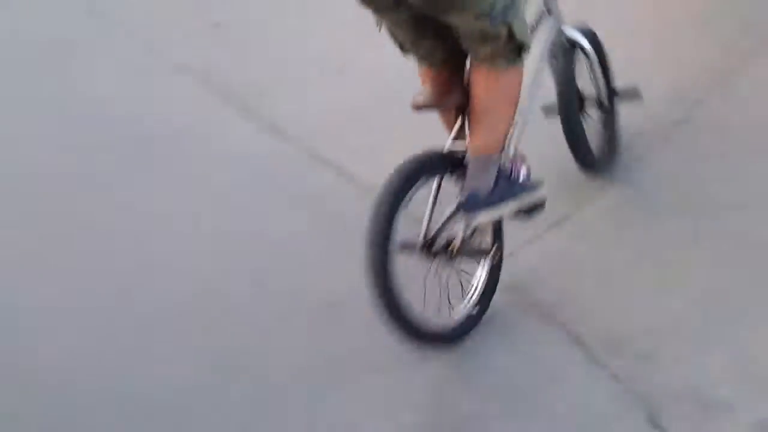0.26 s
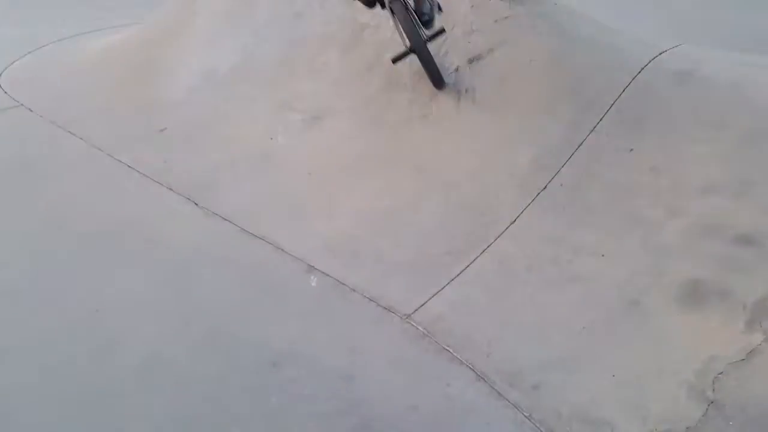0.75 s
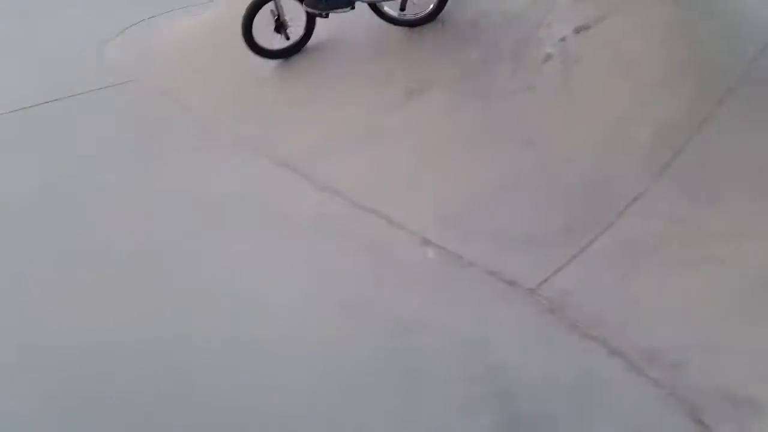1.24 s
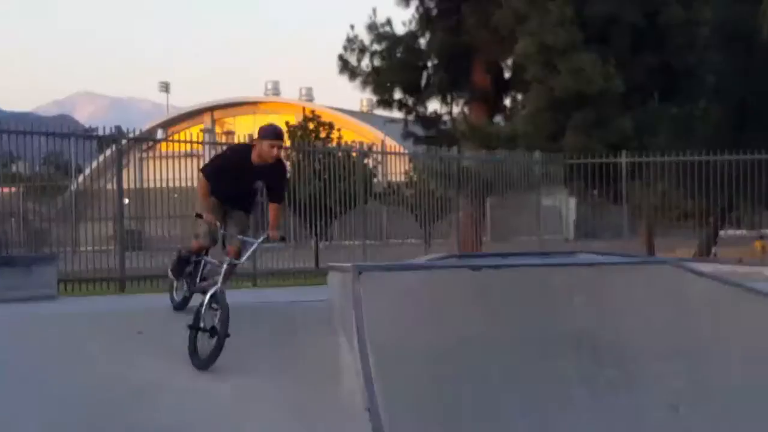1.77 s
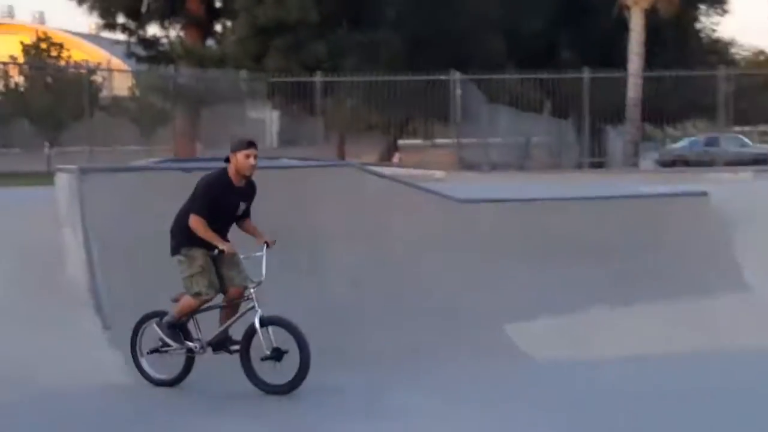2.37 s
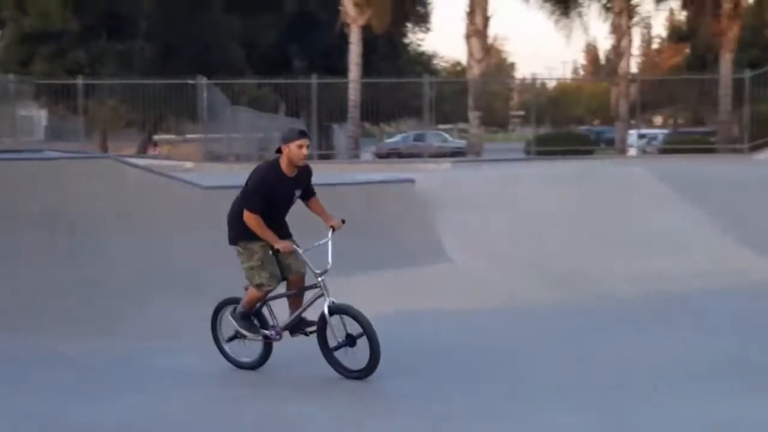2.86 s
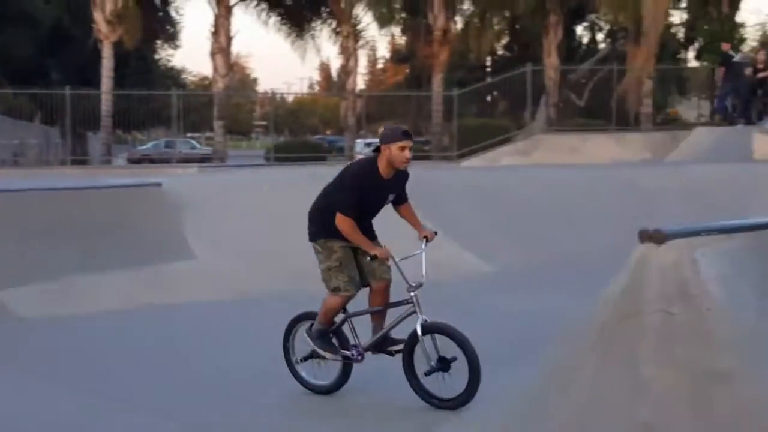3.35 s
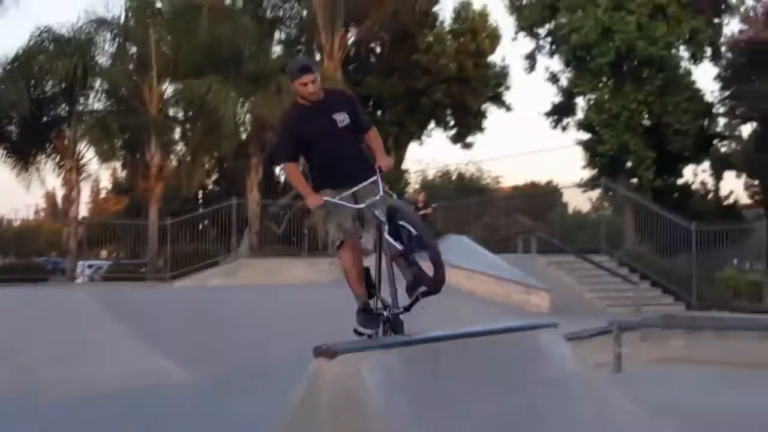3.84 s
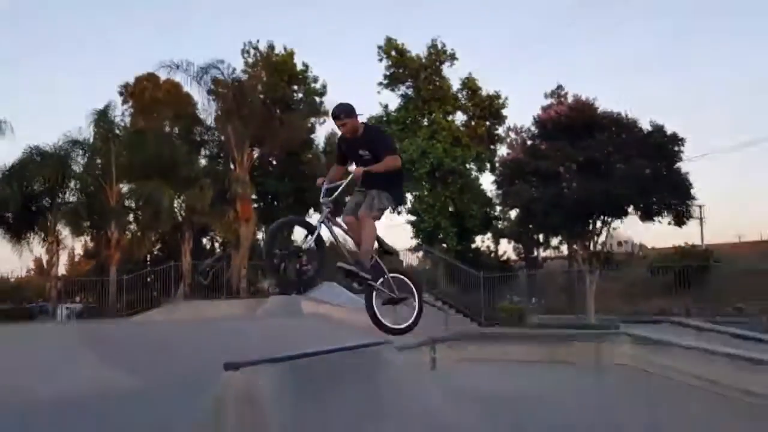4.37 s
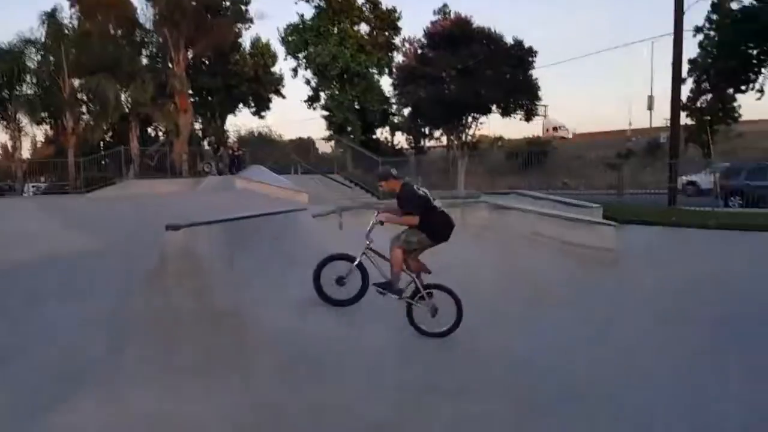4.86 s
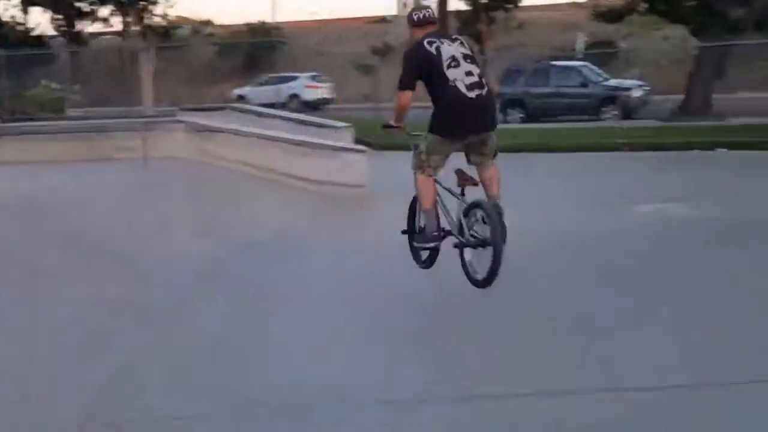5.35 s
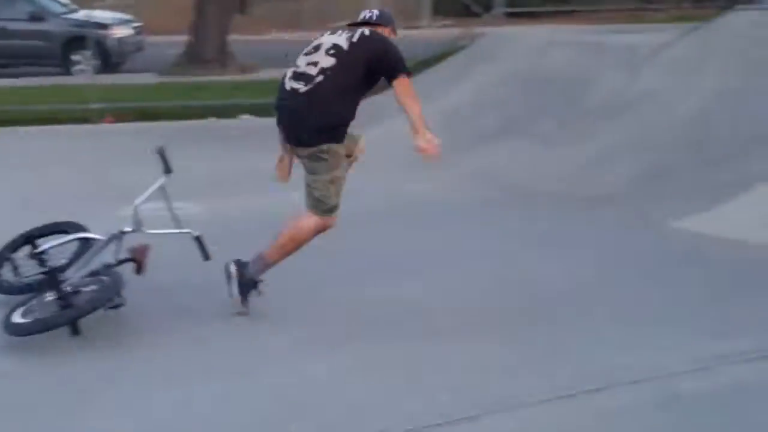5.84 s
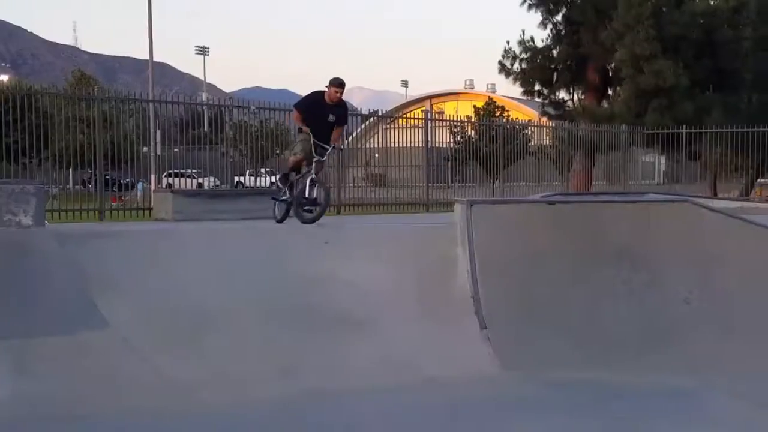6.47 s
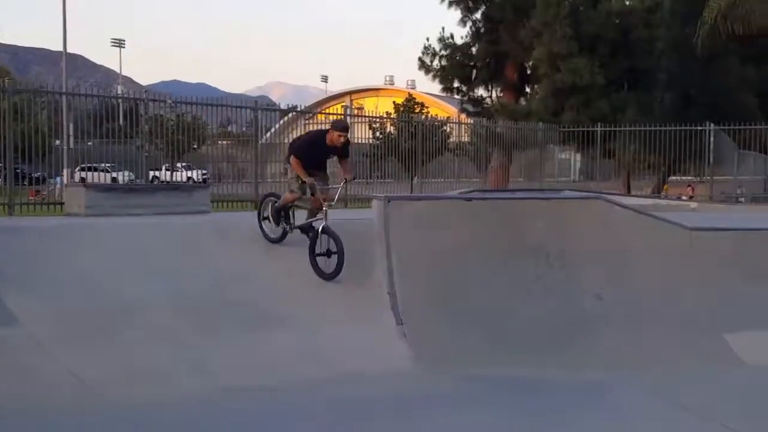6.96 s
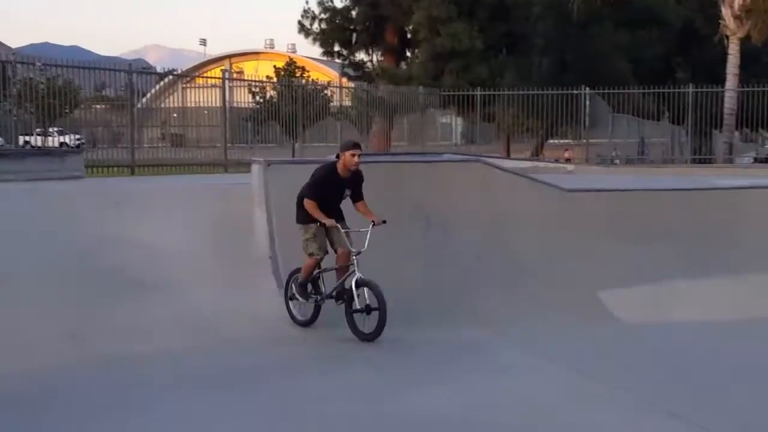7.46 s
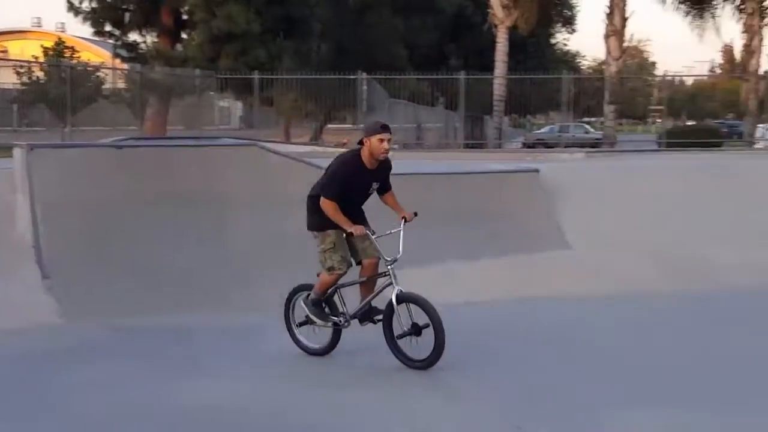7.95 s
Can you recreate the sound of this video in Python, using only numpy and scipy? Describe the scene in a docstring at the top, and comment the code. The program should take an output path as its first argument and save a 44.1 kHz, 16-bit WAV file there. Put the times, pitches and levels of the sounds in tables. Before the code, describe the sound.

A bicycle hisses and ticks over concrete beside a rumbling road, lands with a rattle, then its steel frame crashes and clatters; two brief silences.

```python
"""Near bicycle on concrete: it is dropped and its steel frame clatters (struck modes, cracks, scrapes).
Before that it hisses past (gritty noise), freewheel ticking (noise puffs), and lands with a rattle (clicks).
Knocks echo off concrete banks. Behind it a far road roars, rumbles (shaped noise) and drones (resonances).
Three passages parted by silence, the second and third fading in; the last holds only the road."""
import sys
import numpy as np
from scipy import signal
from scipy.fft import rfft, irfft, next_fast_len
from scipy.io import wavfile
from scipy.ndimage import uniform_filter1d

SR = 44100
rng = np.random.default_rng(int(sys.argv[2]) if len(sys.argv) > 2 else 0)


def transcribe(signal):
    """Save signal, clipped to [-1, 1], as a 16-bit WAV file at the path in sys.argv[1]."""
    frames = np.atleast_2d(signal).T
    limited = np.clip(frames, -1, 1)
    pcm = np.round(limited * 32767).astype(np.int16)
    wavfile.write(sys.argv[1], SR, pcm)


N = 362061

# passages between silences: fade_start_s, fade_length_s, cut_s
PASSAGES = [(-1, .2, 1.842), (2.153, .21, 6.407), (6.716, .21, 8.21)]
# far road, its brightness drifting, mostly brighter where the roar is weak:
# time_s, roar_db, rumble_db, tilt_db_per_octave (of the roar, 800-2400 Hz, then held)
ROAD_LEVELS = [(0, -27.5, -32.5, 1.5), (1.799, -26.5, -32.5, 1), (2.2, -33, -34, 2),
               (3.35, -27.5, -31, 0.76), (4.2, -28, -30.5, 0.5), (5.1, -27.5, -30.5, 1),
               (6.3, -28.5, -29, -0.6), (6.801, -33, -36.5, 2.5), (7.2, -29.5, -34.5, 2.5),
               (8.199, -30.5, -35.5, 2.2)]
# far tyre roar, relative spectrum: freq_hz, level_db_per_hz
ROAR_SPECTRUM = [(180, -38.5), (300, -17.5), (548, -6), (844, 3.5), (1110, -0.5), (1540, -3.5), (2340, -8),
                 (3330, -23.5), (4070, -26.5), (5990, -41), (8540, -47.5), (10100, -72), (12000, -68),
                 (15600, -80), (22000, -120)]
# low road rumble, relative spectrum: freq_hz, level_db_per_hz
RUMBLE_SPECTRUM = [(15, -56), (25, -25.5), (43, -9), (114, 3.5), (162, -3.5), (227, -3), (365, -13),
                   (500, -16.5), (650, -46.5), (1100, -120)]
# engine drones: start_s, end_s, pitch_hz, width_hz (each of two passes), level_db
ENGINE_DRONES = [(0, 1.4, 137, 9, -36), (1.3, 2.103, 128.4, 10, -32.5), (4.2, 5.326, 213.6, 45, -32),
                 (5.402, 6.101, 98.2, 16, -34), (6.602, 8.3, 69.6, 5.6, -35.5),
                 (6.699, 8.411, 121.2, 31, -35)]
# bearing of the noise beds: time_s, left_lag_ms, left_minus_right_db
NOISE_BEARING = [(0, -0.27, -0.9), (1.8, -0.24, -1), (2.2, 0.19, -0.8), (3.3, 0.36, 0), (5.3, 0.23, 0.5),
                 (6.3, -0.14, 0), (6.75, 0.061, -1.5), (8.2, 0.28, 0)]
# likeness of left and right noise: freq_hz, likeness_0_to_1
LIKENESS = [(60, 1), (300, 0.93), (800, 0.66), (1200, 0.47), (1600, 0.55), (3000, 0.099), (6000, 0.081)]
# level difference between microphones: freq_hz, left_minus_right_db
MIC_SHADING = [(60, -1.5), (240, -1.5), (480, -1.5), (1890, -1.5), (3770, -10.5), (7520, 3), (15000, 15.5)]
# tyre passes (climb, roll down, landing, skid): start_s, length_s, first_db, last_db
TYRE_PASSES = [(0, 1.6, -44.5, -56), (1.293, 0.52, -48, -43), (4.844, 0.21, -36.5, -59),
               (5.644, 0.24, -47, -71)]
# fallen bicycle skittering: start_s, length_s, first_db, last_db
SLIDE_SPAN = (6, 0.48, -32.5, -36)
# rubber on concrete, relative spectrum: freq_hz, level_db_per_hz
HISS_SPECTRUM = [(1470, -30), (2500, -7), (3830, -20.5), (6190, -23), (6730, -28), (9280, -24.5),
                 (10800, -39), (12000, -31.5), (15000, -50.5)]
# even ticking, rolling down: start_s, end_s, ticks_per_s
COAST_TICKS = (1.2875, 1.84, 42.6)
# pawl tick, relative spectrum: freq_hz, level_db_per_hz
PAWL_SPECTRUM = [(1760, -25), (3000, -1), (4740, -12), (6080, -5), (6730, -14.5), (9170, -11.5),
                 (10800, -25.5), (12000, -16), (14200, -28), (15000, -64)]
# chain, pedal and peg clicks; at 5.262 s a very faint broad puff of noise:
# start_s, start_level_db, centre_hz, width_hz (each of two passes), t60_s
CLICKS_AND_PUFF = [(.296, -47.5, 9000, 9000, 0.043), (1.164, -30.5, 3900, 1200, 0.019),
                   (1.165, -45, 9000, 9000, .015), (2.69, -57, 6000, 9000, 0.012),
                   (2.784, -55, 6000, 8900, 0.013), (3.471, -47, 4950, 9000, .01),
                   (4.068, -41, 5000, 9000, 0.009), (4.8434, -25.5, 4000, 5000, 0.011),
                   (4.869, -37, 4160, 1200, .04), (4.87, -38.5, 8500, 1200, 0.056),
                   (4.914, -45, 8360, 1200, 0.033), (5.262, -61, 9000, 9000, 0.18),
                   (5.53, -41, 6000, 9050, 0.084), (5.640, -51, 6000, 9000, .03),
                   (5.645, -26, 5600, 1300, 0.03), (5.698, -48, 6500, 1000, 0.35),
                   (5.778, -35, 4200, 4000, 0.03), (5.785, -50, 11440, 4000, 0.16)]
# frame on concrete: start_s, blow_db, rise_s, share_of_free_t60, scrape_db, favoured_pitch_hz
FRAME_BLOWS = [(5.8091, -3, 0.00018, .06, -13, 850), (5.8117, -10, .0004, .06, -19, 720),
               (5.9012, -20, .002, .4, -12.5, 1290), (5.906, -8, 0.0032, 0.5, -16, 780),
               (5.922, -11.5, 0.0018, .6, -19.5, 760), (5.9675, -8, 0.0016, 0.4, -19, 710),
               (5.995, -6.5, 0.005, 0.45, -16, 680), (6.024, -17, .002, .5, -30.5, 710),
               (6.066, -7.5, 0.0012, .8, -24.5, 650), (6.080, -7.5, 0.0014, 0.6, -23.5, 710),
               (6.116, -9, 0.003, 0.6, -24, 620), (6.126, -11, 0.0021, 0.88, -20.5, 620),
               (6.140, -8.5, .002, 0.29, -25.5, 320), (6.362, -14, .002, 0.25, -18, 1000),
               (6.3675, -9.5, 0.004, 0.42, -16, 637), (6.379, -16.5, .0015, .5, -23, 677)]
# modes of steel frame and tyres ringing free: freq_hz, relative_level_db, t60_s
FRAME_MODES = [(151, 6.5, 0.083), (316, -1, 0.26), (623, 4, 0.14), (657.4, 8.5, 0.1), (703, 6.5, 0.11),
               (797, -1, 0.13), (881, 2.5, .08), (1295, 3.5, 0.1), (1920, -10.5, 0.1), (2464, -1.5, 0.095),
               (3263, -11, 0.074), (3970, -15, 0.055), (4920, -8.5, 0.03), (5600, -15.5, .05)]
# steel scraping concrete, relative spectrum: freq_hz, level_db_per_hz
SCRAPE_SPECTRUM = [(450, -40), (700, -13), (1600, -16.5), (2400, -19), (3500, -23), (5700, -29.5),
                   (8500, -25.5), (10300, -33.5), (12000, -29), (14500, -51.5), (15500, -56.5)]

TOUCH_S, LIFT_S = .005, .077  # hiss fade in, fade out
# slowing freewheel: first tick, rate then, time to lose 63% of the speed
CLIMB_START_S, CLIMB_TICKS_PER_S, SLOWING_S, CLIMB_TICKS = .4764, 43.8, .445, 15
CLIMB_DB, SOFT_START_DB, SWELL_S = -39.5, -7.5, .08  # first ticks softer
COAST_DB = -46
CATCHES_PER_S, CATCH_SPREAD_DB, CATCH_T60_S = 450, 2.0, .025
SLIDE_DULL_HZ = 2200  # treble above this fades as the slide slows
FREE_SCRAPE_T60_S = .13  # shortened by the ground, as the ring is
SPOT_DB_PER_OCTAVE, SPOT_FLOOR_DB = -55.5, -10.5  # loss away from the favoured pitch
CRACK_DB, CRACK_S = -1.5, .00018  # push of first contact; a slower rise weakens it
RATTLE_DB = 2.5  # loose parts make the scrape stutter
RASP_RELATIVE_WIDTH, BETWEEN_MODES_DB = .03, -8
DETUNE_RATIO = .02  # ground contact shifts modes above 1 kHz
ECHO_DB, ECHO_T60_S, ECHO_DULL_HZ = -5, .42, 3500
BASS_CUT_HZ, EDGE_HZ = 45, 15300


def gain_of(db):
    """Decibels to amplitude."""
    return 10 ** (np.asarray(db) / 20)


def evened(x):
    """Scales to rms 1."""
    return x / np.sqrt(np.mean(x ** 2) + 1e-20)


def read(points, hz):
    """Interpolates a spectrum table on a log-frequency axis."""
    f, value = np.transpose(points)
    return np.interp(np.log(hz + 1), np.log(f + 1), value)


def add(mix, start_s, sound):
    """Mixes a sound in at a time, trimmed to fit."""
    part = mix[..., round(start_s * SR):][..., :sound.shape[-1]]
    part += sound[..., :part.shape[-1]]


def band(x, hz, width_hz):
    """One-pole resonance of gain 1: shift to 0 Hz, smooth, shift back."""
    turn = np.exp(2j * np.pi * hz * np.arange(x.shape[-1]) / SR)
    r = np.exp(-np.pi * max(width_hz, 1) / SR)
    return 2 * (turn * signal.lfilter([1 - r], [1, -r], x / turn)).real


def wash(spectrum, patchy_db, size, tilt=((0, 0),)):
    """Two-microphone noise from one bearing: partly alike, one side delayed, with drifting patches."""
    hop = size // 4
    frames, hz = N // hop + 5, np.fft.rfftfreq(size, 1 / SR)[:, None]
    t = np.arange(frames) * hop / SR
    a, b, c, d, patches = rng.standard_normal((frames, len(hz), 5)).T
    patches = uniform_filter1d(patches, size=size // 50, axis=0)
    patches = evened(uniform_filter1d(patches, size=16, axis=1))

    time_s, lag_ms, lean_db = np.transpose(NOISE_BEARING)
    lag_s = np.interp(t, time_s, lag_ms) / 1000
    lean = gain_of(np.interp(t, time_s, lean_db) / 2)
    same = np.clip(read(LIKENESS, hz), 0, 1)
    left = a + 1j * b
    right = same * left * np.exp(2j * np.pi * hz * lag_s) + np.sqrt(1 - same ** 2) * (c + 1j * d)

    octaves = np.log2(np.clip(hz / 800, 1, 3))
    tilt_db = octaves * np.interp(t, *np.transpose(tilt))
    z = np.array([left * lean, right / lean])
    z = z * gain_of(read(spectrum, hz) + tilt_db + patchy_db * patches)
    return evened(signal.istft(z, nperseg=size, noverlap=size - hop)[1][:, :N])


def road():
    """Roar of far tyres, low rumble, and wavering engine drones swelling out of it."""
    time_s, roar_db, rumble_db, tilt = np.transpose(ROAD_LEVELS)
    t = np.arange(N) / SR
    roar = wash(ROAR_SPECTRUM, 1.17, size=1024, tilt=np.transpose([time_s, tilt]))
    rumble = wash(RUMBLE_SPECTRUM, .7, size=2048)
    out = gain_of(np.interp(t, time_s, roar_db)) * roar
    out = out + gain_of(np.interp(t, time_s, rumble_db)) * rumble
    for start_s, end_s, hz, width_hz, db in ENGINE_DRONES:
        noise = rng.standard_normal(2 * SR)[:round((end_s - start_s) * SR)]
        drone = band(band(noise, hz, width_hz), hz, width_hz)
        # an engine holds its level better than noise
        envelope = abs(signal.hilbert(drone, 2 * SR)[:len(drone)])
        drone = drone / np.sqrt(envelope + 1e-9)
        fade = signal.windows.tukey(len(noise), .25)
        add(out, max(start_s, 0), gain_of(db) * evened(drone) * fade)
    return out


def ramps(x):
    """Sparse dull echoes off the concrete banks, other ones at each microphone."""
    at = np.arange(300, 16000, 20) + rng.integers(0, 20, (2, 785))
    taps = np.zeros((2, 16100))
    strength = rng.choice([-1., 1.], at.shape) * gain_of(-60 * at / SR / ECHO_T60_S)
    np.put_along_axis(taps, at, strength, 1)
    taps = taps / np.linalg.norm(taps[0])
    taps = signal.lfilter(*signal.butter(1, ECHO_DULL_HZ, fs=SR), taps)
    return signal.oaconvolve(x, taps, axes=1)[:, :N]


def tyres():
    """Gritty hiss of rubber on concrete, heard only in the close passes."""
    t, near = np.arange(N) / SR, np.zeros(N)
    for start_s, length_s, first_db, last_db in TYRE_PASSES:
        u = t - start_s
        contact = np.interp(u, [-TOUCH_S, 0, length_s, length_s + LIFT_S], [0, 1, 1, 0])
        near = near + contact * gain_of(np.interp(u, [0, length_s], [first_db, last_db]))
    grit = gain_of(2.6 * evened(uniform_filter1d(rng.standard_normal(N), size=150)))
    return near * grit * wash(HISS_SPECTRUM, 2.5, size=256)


def freewheel():
    """Pawl drops as noise puffs, softened as by pawls not quite together; slowing uphill, even downhill."""
    start_s, end_s, rate = COAST_TICKS
    even = []
    for k, (shift, more) in enumerate(rng.standard_normal((40, 2))):
        if k < (end_s - start_s) * rate:
            even.append((start_s + k / rate + .0017 * shift, COAST_DB + 2.2 * more))

    # tick times under exponentially falling speed
    left = 1 - np.arange(CLIMB_TICKS) / (CLIMB_TICKS_PER_S * SLOWING_S)
    since_s = -SLOWING_S * np.log(np.maximum(left, 1e-3))
    climb_s = CLIMB_START_S + since_s + .003 * rng.standard_normal(CLIMB_TICKS)
    climb_db = CLIMB_DB + SOFT_START_DB * np.exp(-since_s / SWELL_S)
    climb_db = climb_db + 1.1 * rng.standard_normal(CLIMB_TICKS)

    t, shape = np.arange(1600) / SR, np.zeros(N)
    puff = (1 - np.exp(-t / .002)) * gain_of(-60 * t / .074)
    for tick_s, db in [*zip(climb_s, climb_db), *even]:
        add(shape, tick_s, gain_of(db) * puff)
    return shape * wash(PAWL_SPECTRUM, 2.5, size=256)


def clicks():
    """Small steel parts knock, a sharp start and a short noisy ring; one faint puff is made likewise."""
    out, t = np.zeros((2, N)), np.arange(4000) / SR
    for start_s, db, hz, width_hz, t60_s in CLICKS_AND_PUFF:
        shared, *own = rng.standard_normal((3, len(t)))
        noise = .75 * shared + np.array(own)
        ring = evened(band(band(noise, hz, width_hz), hz, width_hz))
        decay = gain_of(db - 60 * t / max(t60_s, .003))
        add(out, start_s, decay * np.minimum(t / .0007, 1) * ring)
    return out


def rasped(noise, mode_hz, mode_db):
    """Scrape noise coloured by the frame's modes."""
    hz = np.fft.rfftfreq(noise.shape[-1], 1 / SR)
    peaks = gain_of(mode_db) / (1 + ((hz / mode_hz - 1) / RASP_RELATIVE_WIDTH) ** 2)
    colour = gain_of(read(SCRAPE_SPECTRUM, hz)) * (gain_of(BETWEEN_MODES_DB) + peaks.sum(0))
    return evened(irfft(rfft(noise) * colour, noise.shape[-1]))


def slide():
    """Pegs, pedal and bars catch on the rough concrete at random, each catch a short rasp."""
    start_s, length_s, first_db, last_db = SLIDE_SPAN
    t = np.arange(round(length_s * SR)) / SR
    chance, size = rng.random(SR)[:len(t)], rng.exponential(1, SR)[:len(t)]
    catches = (chance < CATCHES_PER_S / SR) * gain_of(CATCH_SPREAD_DB * np.minimum(size, 3))
    # catches add in power
    power = signal.oaconvolve(catches ** 2, gain_of(-120 * t[:2000] / CATCH_T60_S))[:len(t)]
    grain = np.sqrt(power.clip(0))
    scrape = rasped(rng.standard_normal((2, SR)), np.array(FRAME_MODES)[:, :1], -8.0)
    rasp = evened(grain * scrape[:, :len(t)])
    slowed = t / length_s
    dull = signal.lfilter(*signal.butter(2, SLIDE_DULL_HZ, fs=SR), rasp)
    rasp = (1 - slowed) ** 2 * rasp + slowed * 2 * dull
    out = np.zeros((2, N))
    add(out, start_s, rasp * gain_of(first_db + (last_db - first_db) * slowed))
    return out


def crash():
    """Each blow cracks, swells up in the frame's modes, held down by the ground, with a scrape of steel."""
    out, t = np.zeros((2, N)), np.arange(6000) / SR
    free_hz, mode_db, mode_t60_s = np.transpose(FRAME_MODES)[:, :, None]
    side_db = np.array([[1.5], [-1.5]])  # a little to the left
    for start_s, db, rise_s, free, scrape_db, spot_hz in FRAME_BLOWS:
        # each spot excites the modes differently
        struck, turn, shift = rng.standard_normal((3, len(FRAME_MODES), 1))
        free, rise_s = max(free, .02), max(rise_s, .0001)
        hz = free_hz * (1 + DETUNE_RATIO * shift * (free_hz > 1000))
        spot_db = np.maximum(SPOT_DB_PER_OCTAVE * abs(np.log2(hz / spot_hz)), SPOT_FLOOR_DB)
        decay = gain_of(mode_db + spot_db + 2.0 * struck - 60 * t / (mode_t60_s * free))
        modes = decay * np.sin(2 * np.pi * hz * t + .45 * turn)
        swell = 1 - np.exp(-t / rise_s)
        ring = -modes.sum(0) * swell

        u = t / CRACK_S - 3.5
        crack = gain_of(CRACK_DB) * min(CRACK_S / rise_s, 1) * (u ** 2 - 1) * np.exp(-u ** 2 / 2)

        rattle = gain_of(RATTLE_DB * evened(uniform_filter1d(rng.standard_normal(len(t)), size=120)))
        shared, *own = rng.standard_normal((3, len(t)))
        scrape = rasped(.81 * shared + np.array(own), hz, 2.1 * struck)
        scrape = scrape * gain_of(scrape_db - 60 * t / (FREE_SCRAPE_T60_S * free))

        blow = gain_of(db + side_db) * (ring / abs(ring).max() + crack)
        add(out, start_s, blow + np.sqrt(swell) * rattle * scrape)
    return out


def scene():
    """Road behind, bicycle in front; only its knocks echo."""
    knocks = clicks() + crash() + slide()
    echoes = gain_of(ECHO_DB) * ramps(knocks)
    return road() + tyres() + freewheel() + knocks + echoes


def record(dry):
    """Microphone shading and bass cut, linear fade-ins and hard cuts, then the band limit."""
    size = next_fast_len(N + SR)
    hz = np.fft.rfftfreq(size, 1 / SR)
    shade = gain_of(read(MIC_SHADING, hz) / 2)
    response = np.array([shade, 1 / shade]) / np.sqrt(1 + (BASS_CUT_HZ / (hz + 1)) ** 4)
    padded = np.pad(dry, ((0, 0), (0, size - N)), "reflect")
    shaded = irfft(rfft(padded) * response, size)[:, :N]

    t, fader = np.arange(N) / SR, np.zeros(N)
    for start_s, fade_s, cut_s in PASSAGES:
        fader += np.clip((t - start_s) / fade_s, 0, 1) * np.clip((cut_s - t) / .0025, 0, 1)
    lowpass = signal.firwin(511, EDGE_HZ, window=("kaiser", 9), fs=SR)
    return signal.oaconvolve(shaded * fader, lowpass[None], "same")


dry = scene()
out = record(dry)
transcribe(out)
```